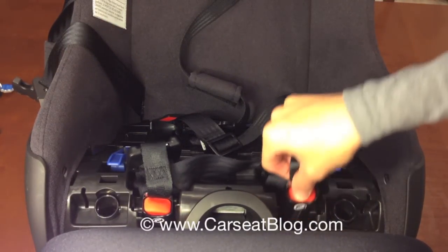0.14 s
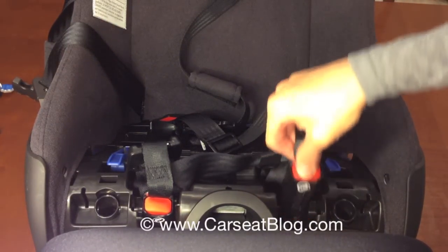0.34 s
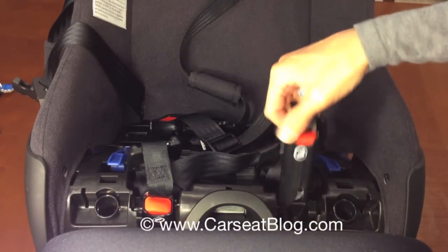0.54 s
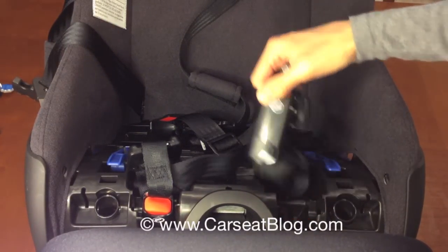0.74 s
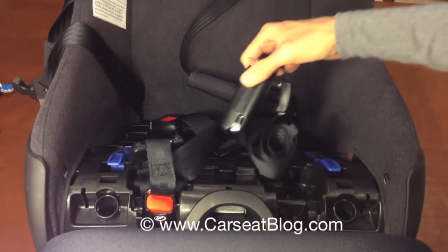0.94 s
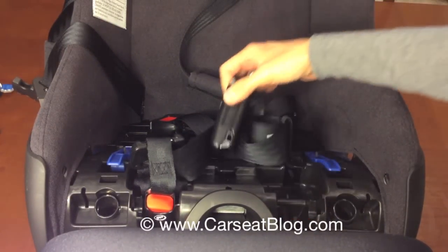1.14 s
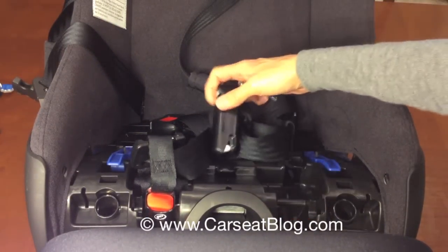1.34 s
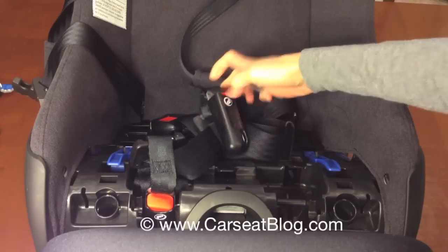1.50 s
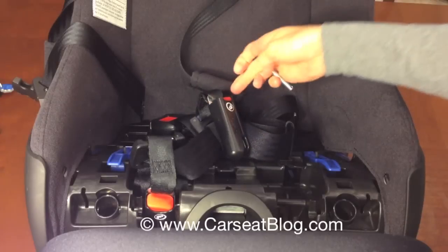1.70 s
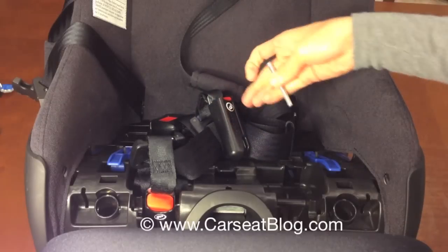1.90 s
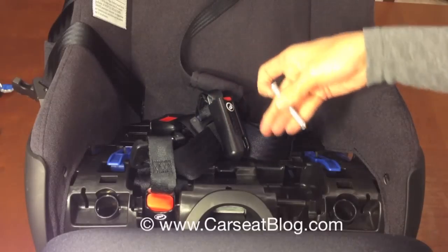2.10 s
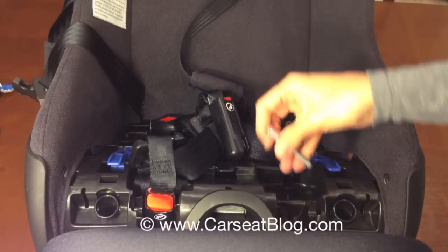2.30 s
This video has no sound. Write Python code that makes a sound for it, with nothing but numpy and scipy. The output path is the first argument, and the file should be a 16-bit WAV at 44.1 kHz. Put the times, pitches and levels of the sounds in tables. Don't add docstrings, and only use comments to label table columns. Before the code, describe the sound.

Hard plastic latch click, soft webbing rustle, then a connector landing with a metallic-edged clack.

```python
import sys
import numpy as np
from scipy import signal
from scipy.fft import rfft, irfft
from scipy.io import wavfile
from scipy.ndimage import uniform_filter1d

SR = 44100
rng = np.random.default_rng(int(sys.argv[2]) if len(sys.argv) > 2 else 0)


def boost(x):
    u = np.asarray(x, float) / 20
    return 10 ** u


def persist_wave(psi):
    counts = np.round(np.clip(psi, -1, 1) * 32767).astype(np.int16)
    wavfile.write(sys.argv[1], SR, np.atleast_2d(counts).T)


N = 103635

# (frequency [Hz], level [dB], decay time t60 [s])
LATCH_MODES = [(734, -24.5, 0.03), (1447, -12, 0.031), (1906, -6.5, 0.0273), (2386, -2, 0.03),
               (3084, 0, 0.02), (3610, 12.5, 0.011), (4197, -3.5, 0.02), (5780, -6, 0.018),
               (6080, -13.5, 0.021), (6655, -8.5, 0.02), (7980, -14, 0.025), (9800, -19.5, 0.024),
               (11550, -7.5, 0.0073), (12460, -16.5, 0.02)]
TONGUE_MODES = [(2400, 7.5, 0.025), (3400, 12, 0.019), (4310, 12, 0.018), (4800, -2, 0.014),
                (6760, 6, 0.014), (8250, -14, .01), (11100, -17, .008)]
BUTTON_MODES = [(1500, -5, 0.017), (1925, -4.5, 0.019), (3304, 10.5, 0.014), (3350, -11, 0.084),
                (4330, -6, 0.014), (5180, -2.5, 0.014), (5750, -6, 0.01), (7260, -8, .008),
                (8060, 2, 0.012), (8800, -18, 0.0049), (11100, -13.5, 0.006)]
HOUSING_MODES = [(900, -16, 0.014), (1384, 3.5, 0.015), (2020, 4.5, 0.015), (2400, -4, 0.022),
                 (3250, 1, 0.0217), (4100, -8, 0.011), (5200, -14.5, 0.012)]
SHELL_MODES = [(126, -20, 0.16), (191, -19, 0.13), (264, 1, 0.18), (336.6, 10, 0.11), (401, 10, 0.054),
               (520, -12, 0.043), (768, -15, 0.09)]
BODY_MODES = [(101, -17.5, 0.21), (193.2, -6, 0.13), (288, 1, 0.065), (405, 1, 0.04), (533, 2, 0.028),
              (856, -6, 0.058), (1340, 2.5, 0.024), (1850, 2, 0.016), (2220, 2.5, 0.021), (1070, -6, 0.025),
              (3110, -8.5, 0.015), (4470, -12, 0.0095), (5560, -13.5, 0.011), (12500, -39, .006)]
TIP_MODES = [(120, -14, .2), (197, -12, .08), (271, -5.5, 0.077), (350, -1.5, 0.058), (527, -1.5, 0.037),
             (887, -11.5, 0.053), (1070, -2, 0.028), (1423, 1, 0.031), (1792, 1.5, .016),
             (2307, -12.5, 0.048), (2810, 0, 0.013), (3130, -16, 0.014), (3850, -21.5, 0.023),
             (6100, -26.5, .01)]
HOOK_MODES = [(4900, 4, 0.019), (5200, -1.5, 0.08), (6720, -3.5, 0.02), (8446, -16, .05),
              (9030, 2.5, 0.043), (10240, -11, .04), (11010, -7.5, 0.04), (11840, -12, 0.031),
              (13600, -14, .04), (13880, -3, 0.058)]
HOOK_BOUNCE_MODES = [(5259, -4.5, 0.086), (5616, 4.5, 0.034), (6090, -2, 0.03), (10940, -15, 0.023)]

# (time [s], peak level [dB], contact time [s], brightness [dB per octave])
LATCH_BLOWS = [
    (.116, -49, 0.0011, -3),
    (.1585, -29.5, 0.0014, -1.5),
    (.180, -43, 0.0047, -8.5),
    (.2148, -36.5, 0.0029, 3.5),
    (.227, -45, 0.0022, -9),
    (.2313, -16, 0.0024, 5),
    (.2335, -20.5, 0.0017, -5.5),
    (.237, -39.5, 0.0019, -17),
]
TONGUE_BLOWS = [
    (.2535, -23, 0.0015, 0.5),
    (.2572, -35.5, 0.0014, 0),
    (.262, -39.5, 0.001, -15),
    (.270, -42.5, 0.0068, -4),
    (.287, -44, .002, -9),
]
BUTTON_BLOWS = [
    (.380, -46.5, 0.0046, 0),
    (.3858, -33.5, 0.00081, 2.9),
    (.3875, -31.5, 0.0013, 0),
]
HOUSING_BLOWS = [
    (.136, -52, 0.0027, 11),
    (.4235, -42, 0.0018, 7),
    (.426, -41.5, 0.00064, -11),
    (.444, -35, 0.002, 4.5),
    (.447, -40.5, 0.0012, 0),
    (.459, -57, 0.0018, 0),
    (1.2668, -40, 0.0017, 2),
]
SHELL_BLOWS = [(.113, -40, 0.0046, -12.5), (.136, -46.5, 0.011, -2), (.158, -41, 0.0028, -18.5),
               (.243, -40, 0.0061, -13.5), (.4255, -39.5, 0.0041, 14.5), (.447, -47.5, 0.0021, 9),
               (.856, -54, 0.0032, 6), (.880, -55.5, 0.0019, 23), (.959, -55.5, 0.0032, -20),
               (.990, -58, 0.0024, 6), (1.267, -37.5, 0.0053, -17), (1.306, -46.5, 0.0071, -6),
               (1.37, -56, 0.0077, -15), (1.785, -54.5, 0.0051, -18)]
BODY_BLOWS = [
    (1.2882, -23, 0.00088, 5.5),
    (1.2908, -23, 0.00088, -3),
    (1.2935, -28.5, 0.0015, 1),
    (1.303, -32, 0.002, 0),
    (1.312, -35, 0.0035, -5),
    (1.320, -39, 0.0039, -2),
    (1.335, -44, 0.0022, 4),
    (1.355, -47.5, 0.0027, 3.5),
    (1.375, -47.5, 0.0028, 4),
]
TIP_BLOWS = [
    (1.6824, -34, 0.0012, 3.5),
    (1.6855, -35.5, 0.00091, -1),
    (1.692, -44, 0.0012, -5),
    (1.698, -40, 0.0031, -2),
    (1.707, -48.5, 0.0026, 1),
    (1.7145, -45.5, .002, -2),
    (1.73, -51.5, 0.0033, -1),
]
HOOK_BLOWS = [
    (1.2545, -28, 0.00045, 0),
    (1.258, -33, 0.00063, 2),
]
HOOK_BOUNCES = [
    (1.2605, -31.5, 0.0011, 0),
    (1.2645, -42, 0.00087, 0),
    (1.289, -42, 0.00079, 0),
]
# (time [s],
# peak level [dB], frequency [Hz], decay time t60 [s])
LONE_MODES = [(.236, -41, 2400, 0.28), (.8515, -51, 880, 0.02), (1, -53, 1300, 0.041),
              (1.222, -56, 2080, 0.071), (1.36, -46.5, 190, 0.2), (1.289, -35.5, 696, .04),
              (0.608, -63, 1670, 0.04), (.610, -65, 1480, .03), (.612, -65, 2960, .03),
                  (.838, -62, 1000, .03), (.979, -60, 1420, 0.02), (.055, -66, 4180, .15),
                  (.08, -65, 3900, .12), (.055, -65, 2010, .08), (.755, -63, 2250, .08),
                  (.79, -62, 2050, .05), (1.485, -63, 4300, .04), (1.455, -62, 2500, .05),
                  (1.55, -61, 640, .05), (1.635, -63, 660, .04), (.715, -65, 2200, .08),
                  (1.255, -52, 2400, .008), (.217, -50, 6300, .012)]

# (time [s], level [dB], brightness [dB per octave])
DRAG_STROKES = [(0, -100, 6), (.05, -65, -3.5), (.11, -60, -6), (.2, -58, -3.5), (.32, -62.5, -4),
                (.38, -60.5, -3.5), (.52, -74, -1.5), (.69, -70, -3.5), (.74, -64.5, -4), (.80, -59.5, -1),
                (.9, -67, -2.5), (1.0, -82, 3), (1.3, -60.5, -7), (1.44, -67, -5), (1.512, -52, -2),
                (1.56, -70.5, -6.5), (1.62, -71, -3), (2.35, -101, 7)]
# (frequency [Hz], density [dB per Hz])
WEAVE_SPECTRUM = [(290, -10), (500, -11.5), (1990, -8), (2940, -5.5), (5000, -4.5), (8000, -10),
                  (11000, -15), (14000, -21)]
# (frequency [Hz], width [Hz], level [dB])
RIB_RESONANCES = [(1850, 430, -10.5), (2290, 97, -15.5), (4160, 600, -17.5)]
# (frequency [Hz], decay time t60 [s])
ROOM_DECAY = [(100, 0.58), (400, 0.3), (1500, 0.39), (4000, 0.18), (9000, 0.15), (15000, 0.056)]
# (frequency [Hz], density [dB per Hz])
HISS_SPECTRUM = [(35, -30), (60, -15.5), (138, -7), (1270, -35), (2420, -25), (15000, -26)]
# (frequency [Hz], width [Hz], level [dB])
DRONE_BANDS = [(144.5, 27, -72.5), (243, 110, -74.5), (54, 13, -76.5)]
# (frequency [Hz], gain [dB])
MIC_RESPONSE = [(20, -14), (90, -2), (200, 0), (15200, 0), (15450, -28), (16400, -31), (16500, -90)]

SPLIT, HOOK_SPLIT, BOUNCE_SPLIT = 0.0279, 0.0034, 0.011
CRACK_DB, METAL_CRACK_DB, CRACK_S = -6, -13.5, 0.0032
RATTLE_DB, RATTLE_S, RATTLE_GRAIN_DB = -28.5, 0.022, 3.5
HOOK_LANDS_S, MUFFLE_DB = 1.268, -16
TAP_RISE_S = 0.0051
GRAINS_PER_S, GRAIN_SPREAD_DB = 2500, 0.5
SMOOTH, PATCHY_DB = 2.5, 2.5
ROOM_DB, ECHO_S, STIR_PER_S = -14, 0.004, 30
HISS_DB = -66.5


def evened(x):
    return x / np.sqrt(np.mean(x ** 2) + 1e-20)


def read(points, hz):
    f, value = np.transpose(points)
    return np.interp(np.log(hz + 1), np.log(f + 1), value)


def filtered(x, points):
    gain = boost(read(points, np.fft.rfftfreq(x.shape[-1], 1 / SR)))
    return irfft(rfft(x) * gain, x.shape[-1])


def coloured(x, points):
    return evened(filtered(x, points))


def resonate(x, hz, width):
    r = np.exp(-np.pi * width / SR)
    return signal.lfilter([1 - r, 0, r - 1], [1, -2 * r * np.cos(2 * np.pi * hz / SR), r * r], x)


def blows(hits, modes, split=SPLIT, crack_db=CRACK_DB):
    out, t = np.zeros(N), np.arange(SR // 5) / SR
    hz, db, t60 = np.repeat(np.transpose(modes), 3, axis=1)[:, :, None]
    order = np.argsort(hz[:, 0])
    centre = np.exp(np.log(hz).mean())
    rough = rng.standard_normal((len(hits), len(t)))
    draws = rng.uniform(-1, 1, (30, 2, 60, 1))[:, :, :len(hz)]
    for (s, peak_db, contact, tilt_db), grit, (detune, phase) in zip(hits, rough, draws):
        rise = np.sin(np.pi / 2 * np.minimum(t / contact, 1)) ** 2
        lean_db = db + tilt_db * np.log2(hz / centre)
        partials = np.sin(2 * np.pi * hz * (1 + split * detune) * t + np.pi * phase)
        ringing = rise * (boost(lean_db - 60 * t / t60) * partials).sum(0)
        ringing /= abs(ringing).max()

        peaks = zip(hz[order, 0], lean_db[order, 0])
        crack = coloured(grit, [(hz.min() / 2, -50), *peaks, (hz.max() * 2, -50)])
        clumps = evened(uniform_filter1d(grit[::-1], size=90))
        rattle = boost(RATTLE_DB + RATTLE_GRAIN_DB * clumps) * np.exp(-t / RATTLE_S)
        snap = boost(crack_db) * np.exp(-t / CRACK_S)
        sound = ringing + crack * rise * (snap + rattle)
        part = out[round(s * SR):][:len(t)]
        part += boost(peak_db) * sound[:len(part)]
    return out


def latch():
    snap = blows(LATCH_BLOWS, LATCH_MODES) + blows(TONGUE_BLOWS, TONGUE_MODES)
    return snap + blows(BUTTON_BLOWS, BUTTON_MODES)


def housing():
    return blows(HOUSING_BLOWS, HOUSING_MODES)


def seat_shell():
    return blows(SHELL_BLOWS, SHELL_MODES)


def landing():
    return blows(BODY_BLOWS, BODY_MODES) + blows(TIP_BLOWS, TIP_MODES)


def hook():
    t = np.arange(N) / SR
    muffled = boost(MUFFLE_DB * np.clip((t - HOOK_LANDS_S) * 300, 0, 1))
    steel = blows(HOOK_BLOWS, HOOK_MODES, HOOK_SPLIT, METAL_CRACK_DB) * muffled
    return steel + blows(HOOK_BOUNCES, HOOK_BOUNCE_MODES, BOUNCE_SPLIT, METAL_CRACK_DB)


def lone_modes():
    touches = LONE_MODES
    return sum(blows([(s, db, TAP_RISE_S, 0)], [(hz, 0, t60)]) for s, db, hz, t60 in touches)


def drag():
    s, db, tilt_db = np.transpose(DRAG_STROKES)
    strength = boost(GRAIN_SPREAD_DB * np.minimum(rng.exponential(1, N), 4))
    slips = strength * (rng.random(N) < GRAINS_PER_S / SR) * rng.standard_normal(N)
    weave = coloured(evened(slips) + SMOOTH * rng.standard_normal(N), WEAVE_SPECTRUM)
    ribs = sum(boost(d) * resonate(weave, f, w) for f, w, d in RIB_RESONANCES)
    weave = evened(weave + 3 * ribs)

    hz, t, z = signal.stft(weave, SR, nperseg=256)
    octaves = np.log2(np.maximum(hz, 300) / 2500)[:, None]
    z = z * boost(np.interp(t, s, db) + np.interp(t, s, tilt_db) * octaves)
    patches = uniform_filter1d(rng.standard_normal(z.T.shape), size=6, axis=0)
    patches = uniform_filter1d(patches, size=2, axis=1).T
    return signal.istft(z * boost(PATCHY_DB * evened(patches)), SR, nperseg=256)[1][:N]


def room(x):
    taps, at = np.zeros((2, SR // 2)), np.arange(0, SR // 2 - 20, 20)
    places = at + rng.integers(0, 20, (2, len(at)))
    np.put_along_axis(taps, places, rng.choice([-1., 1.], (2, len(at))), axis=1)
    hz, t, z = signal.stft(taps, SR, nperseg=256)
    decay = boost(-60 * t / read(ROOM_DECAY, hz)[:, None])
    tail = signal.istft(z * decay, SR, nperseg=256)[1]
    tail = np.pad(tail, ((0, 0), (round(ECHO_S * SR), 0))) / np.linalg.norm(tail[0])
    one, two = signal.fftconvolve(x[None], tail, axes=1)[:, :N]
    wander = evened(uniform_filter1d(rng.standard_normal(N), size=500))
    turn = 2 * np.pi * STIR_PER_S * np.cumsum(wander) / SR
    return np.cos(turn) * one + np.sin(turn) * two


def background():
    drone = sum(boost(d) * evened(resonate(rng.standard_normal(N), f, w)) for f, w, d in DRONE_BANDS)
    return boost(HISS_DB) * coloured(rng.standard_normal(N), HISS_SPECTRUM) + drone


def scene():
    near = drag() + hook() + latch() + housing() + seat_shell() + landing() + lone_modes()
    return (near + boost(ROOM_DB) * room(near) + background())[None]


def roll_off(x):
    return signal.sosfilt(signal.butter(12, 16420, fs=SR, output="sos"), x)


def record(dry):
    heard = filtered(dry, MIC_RESPONSE)
    return roll_off(heard)


dry = scene()
out = record(dry)
persist_wave(out)
```